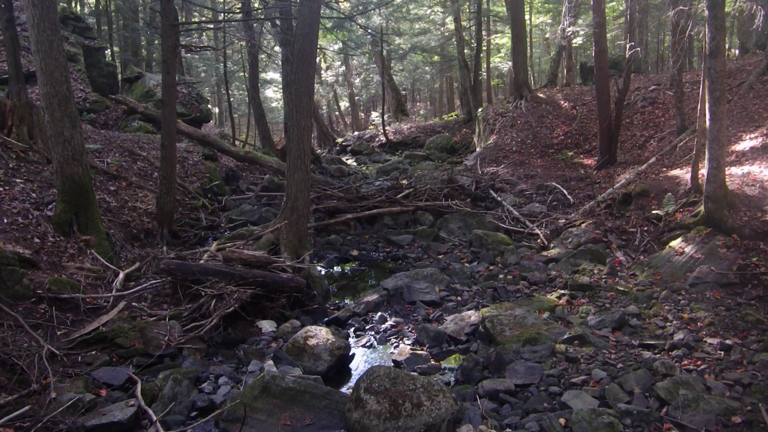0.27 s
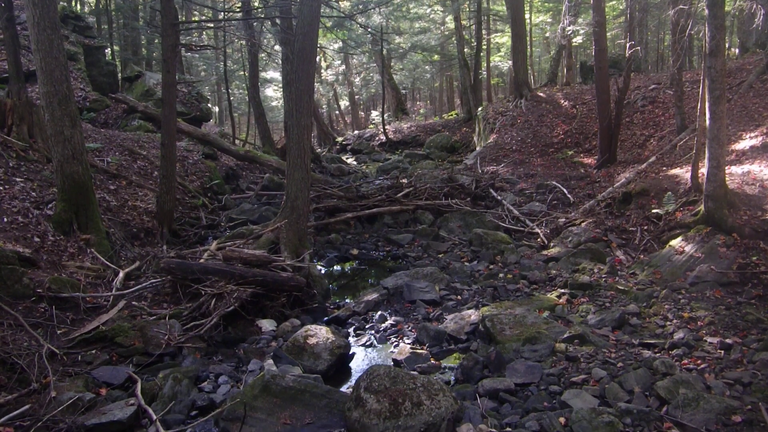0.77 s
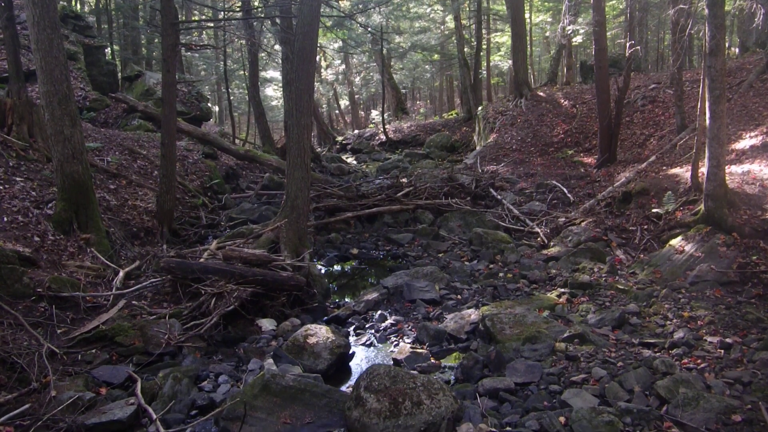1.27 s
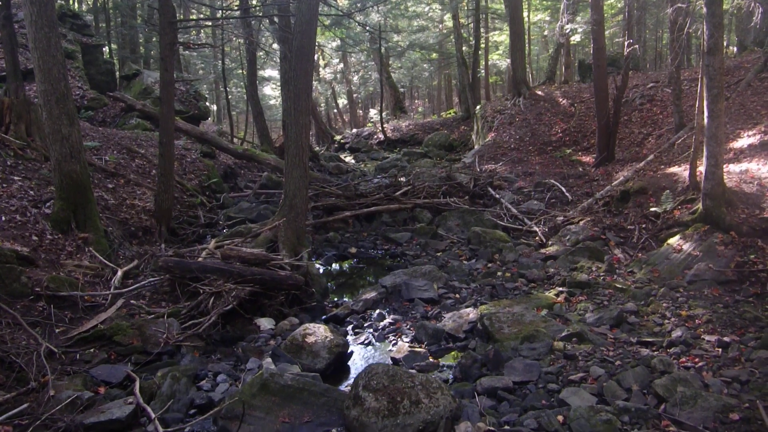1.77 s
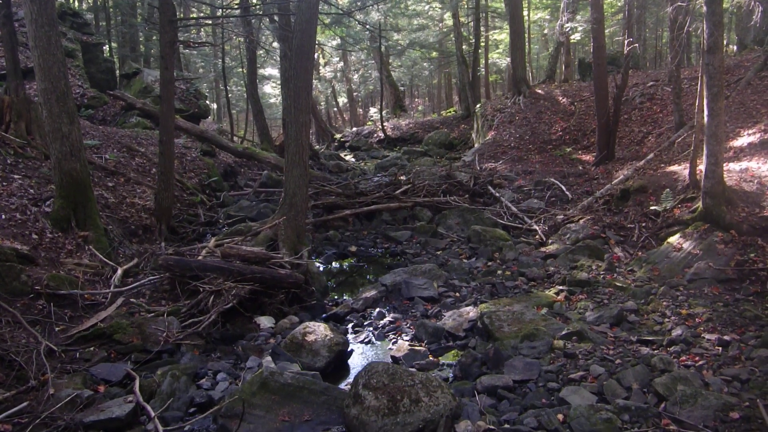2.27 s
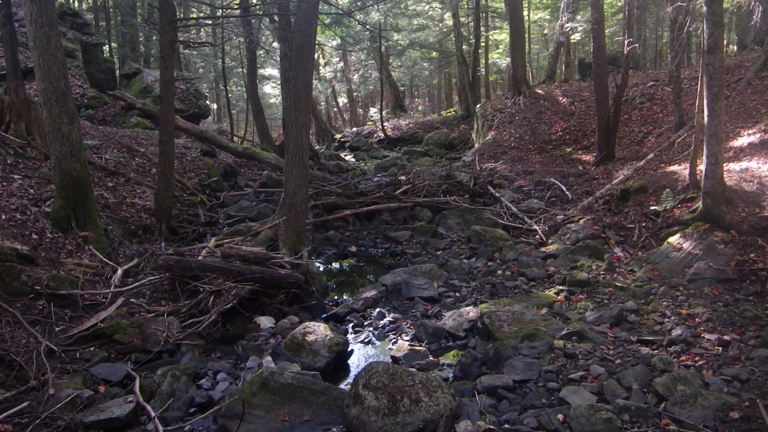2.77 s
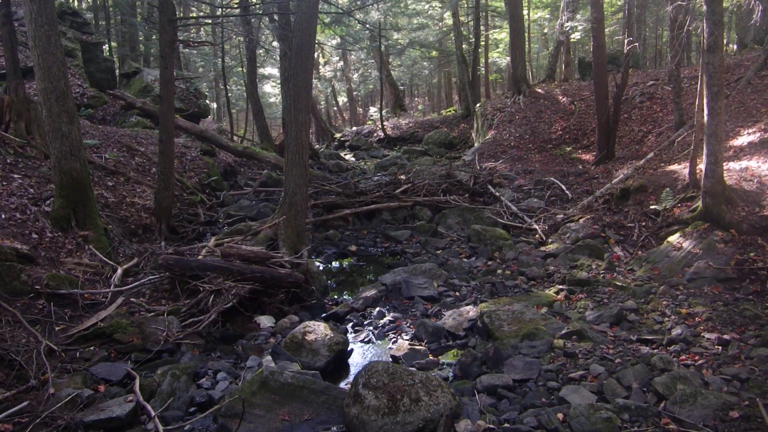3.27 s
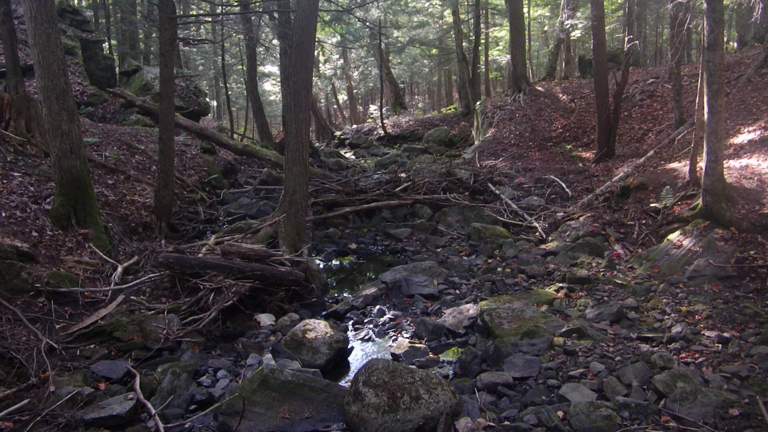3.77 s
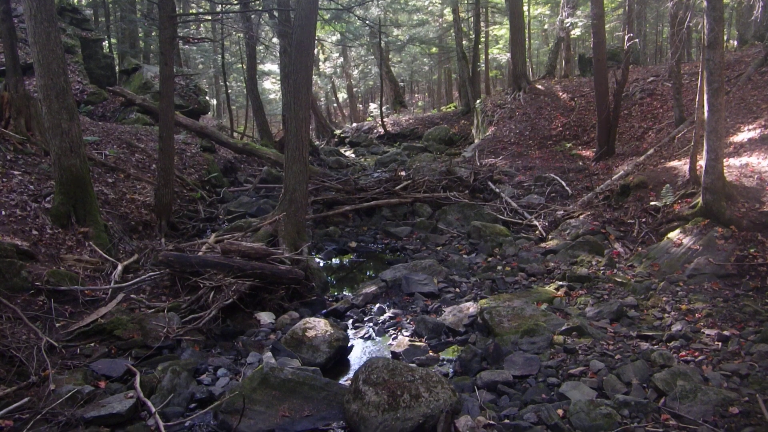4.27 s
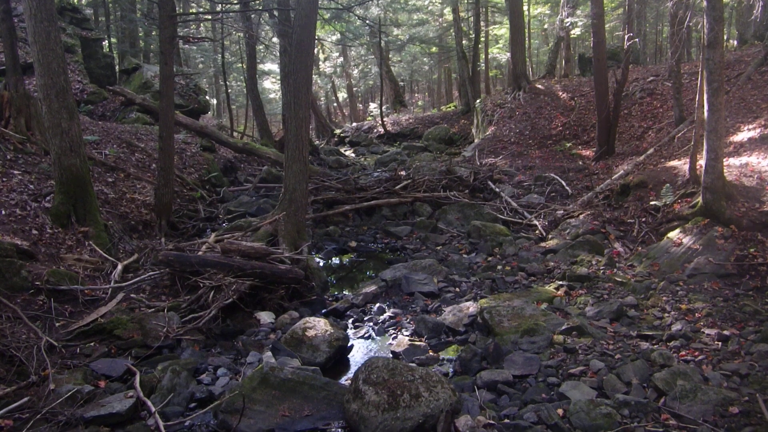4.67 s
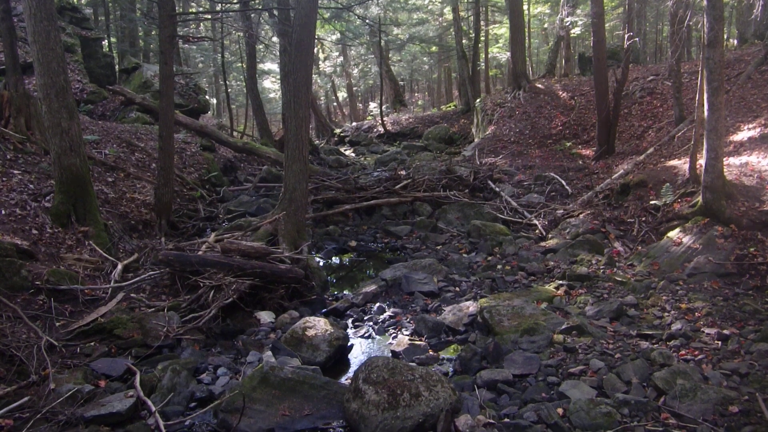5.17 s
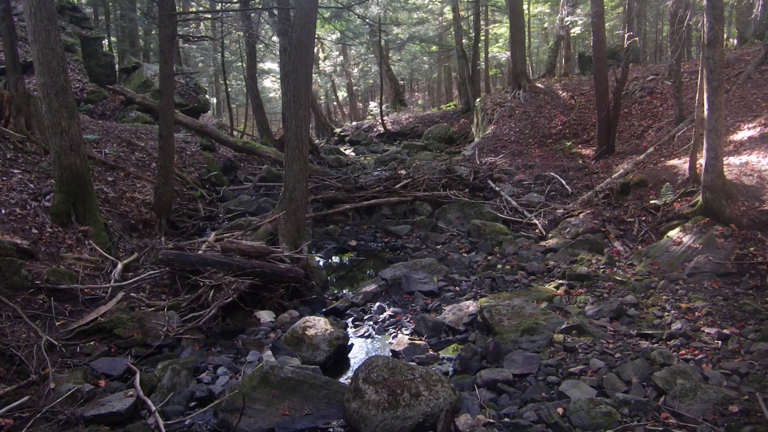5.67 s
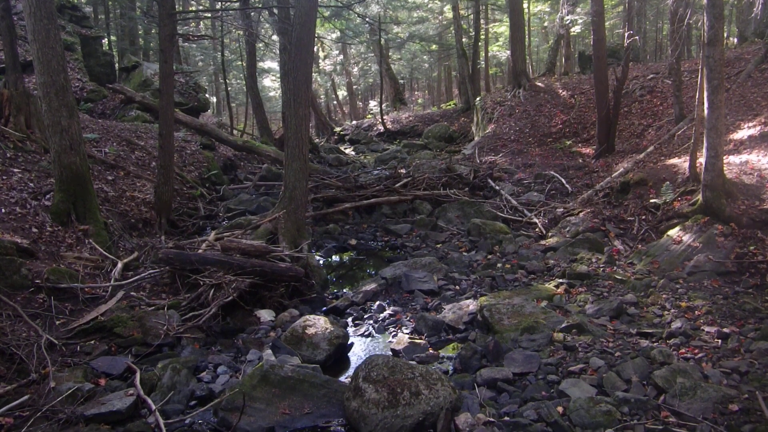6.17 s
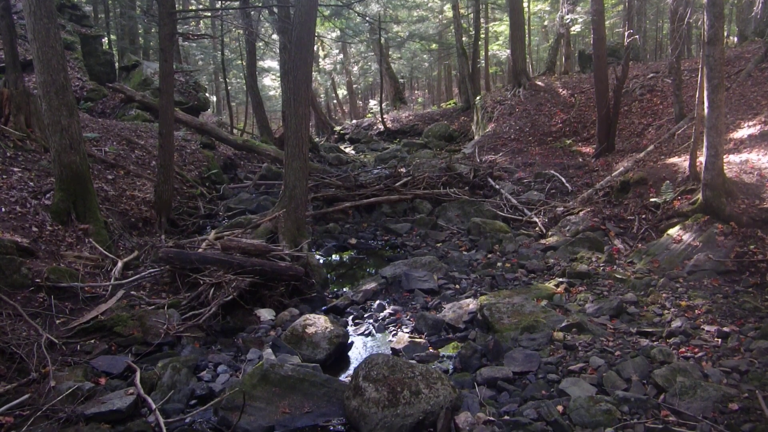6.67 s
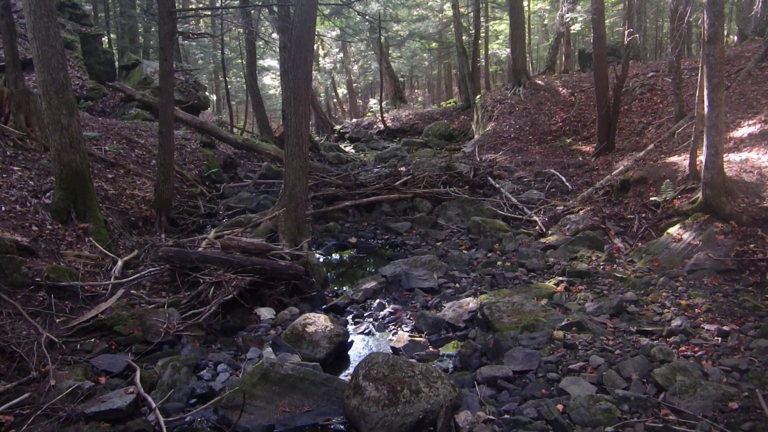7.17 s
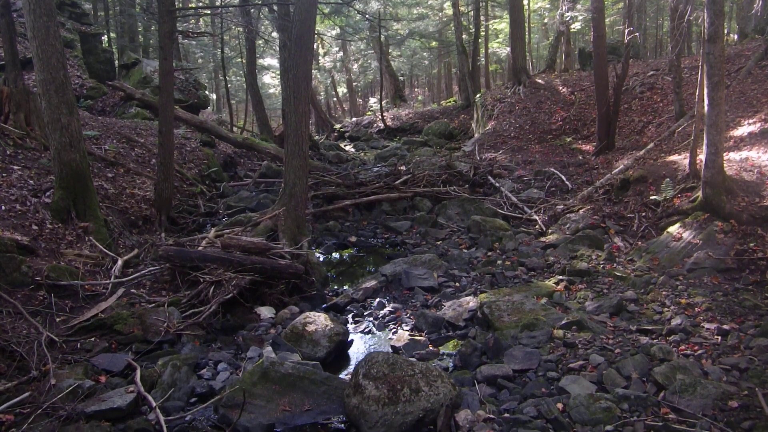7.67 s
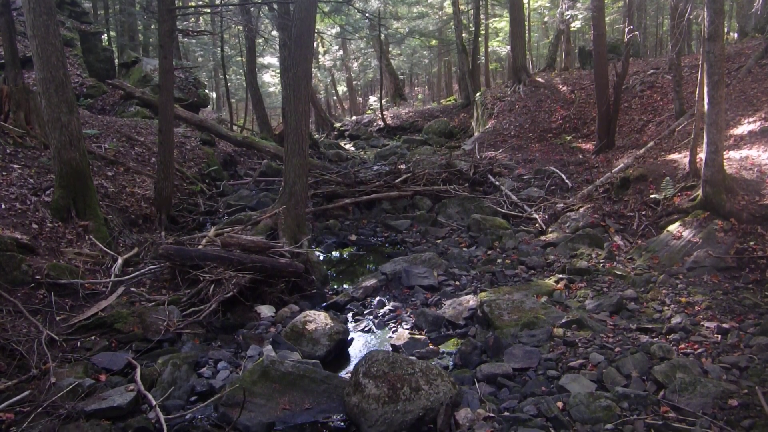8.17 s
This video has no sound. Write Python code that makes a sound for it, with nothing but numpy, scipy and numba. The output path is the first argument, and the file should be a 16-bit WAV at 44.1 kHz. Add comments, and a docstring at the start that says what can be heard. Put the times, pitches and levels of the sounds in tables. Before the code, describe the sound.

A small, shallow forest creek trickles over stones for about 8.4 seconds: a soft, steady wash with clusters of little bubbling gurgles and nearer, rounder plops, notably at 1.2, 3.5, 4.2 and 5.8 seconds. Trees return a short, faint diffuse tail. A hand-held camera adds low, lumpy grip rumble and very close contact noises. Bright plastic snaps with hard body knocks crack at 0.2 and 0.44 seconds. At 1.6 a tick leads straight into the loudest knock, followed by a dull palm bump. Quieter taps lead to a cluster of knocks and a sharp snap at 3.14 to 3.2, while the rumble swells. Later come light taps, faint snaps near 5.4 and 8.0, and soft low bumps at 4.6, 6.5, 7.8 and 8.1. Thin preamp hiss persists; the level ducks after loud peaks and recovers. Mono, with slightly dulled treble.

```python
"""A shallow forest creek trickles over stones throughout: a soft wash with small bubbles in it.
The hand-held camera rumbles in the grip. Hard knocks and snaps come in the first half second; at 1.6 s
a tick leads into the loudest knock, the first soft bump follows, and more snaps come near 3.2 s.
Lighter knocks, a few bumps and faint snaps fill the rest. Body and shell sounds are ringing modes.
The preamplifier hisses, gain control ducks after loud peaks and narrow notches cut the treble."""
import sys
import numpy as np
from scipy import signal
from scipy.fft import rfft, irfft, next_fast_len
from scipy.io import wavfile
from scipy.ndimage import uniform_filter1d, map_coordinates
from numba import njit

SR = 44100
rng = np.random.default_rng(int(sys.argv[2]) if len(sys.argv) > 2 else 0)


def digitize_waveform(pressure):
    """Quantize a signal to 16-bit integers and store it at the path in sys.argv[1].

    Rows of a 2-D input are taken as channels; values are limited to [-1, 1].
    """
    field = np.atleast_2d(pressure).T
    bounded = np.clip(field, -1, 1)
    quanta = np.round(bounded * 32767).astype(np.int16)
    wavfile.write(sys.argv[1], SR, quanta)


N = 371322  # length in samples


def amp(db):
    """Turn decibels into a gain: every 20 dB is a factor of ten."""
    return 10 ** (np.asarray(db) / 20)


def unit(x):
    """Scale x to an average (rms) strength of 1."""
    return x / np.sqrt(np.mean(x ** 2) + 1e-20)


def along(points, hz):
    """Read a curve of (frequency, value) points, spaced by the log of frequency."""
    point_hz, value = np.transpose(points)
    return np.interp(np.log(hz + 1), np.log(point_hz + 1), value)


def wobble(rate):
    """Draw a smooth random curve through this many random points a second."""
    points = rng.standard_normal(int(N * rate / SR) + 4)
    return map_coordinates(points, [np.arange(N) * rate / SR])


def filtered(x, response):
    """Filter x by multiplying its spectrum by a response that depends on frequency."""
    size = next_fast_len(N + SR // 2)  # spare room keeps the end from wrapping onto the start
    hz = np.fft.rfftfreq(size, 1 / SR)
    return irfft(rfft(x, size) * response(hz), size)[..., :N]


def resonances(modes):
    """Build the response of modes that ring when struck: (pitch_hz, width_hz, level_db)."""
    def response(hz):
        return sum(amp(level_db) * 1j * hz * width / (pitch * pitch - hz * hz + 1j * hz * width)
                   for pitch, width, level_db in modes)
    return response


def scatter(start_s, shapes):
    """Add one short sound, a row of shapes, at each start time."""
    first = (np.asarray(start_s) * SR).astype(int)[:, None]
    at = first + np.arange(shapes.shape[1])
    return np.bincount(at.ravel(), shapes.ravel(), N + SR)[:N]


def rush(spectrum, patchy_db):
    """Make coloured noise of rms 1 whose level varies in patches of time and frequency."""
    z = signal.stft(rng.standard_normal(N + 512), nperseg=512)[2]
    patches = uniform_filter1d(rng.standard_normal(z.shape), size=4, axis=0)
    patches = uniform_filter1d(patches, size=8, axis=1)
    noise = signal.istft(z * amp(patchy_db * unit(patches)), nperseg=512)[1][:N]
    return unit(filtered(noise, lambda hz: amp(along(spectrum, hz))))


def wash():
    """Far water blends into coloured noise whose level sways slowly and quickly."""
    # colour of the far water: (frequency_hz, relative level_db per Hz)
    colour = [(71, -17), (120, -4.5), (229, -15), (311, -6.5), (430, -2.5), (754, -12.5), (1320, -13.5),
              (1540, -16), (2570, -16.5), (2890, -18.5), (3200, -26), (4130, -31.5), (4570, -21.5),
              (5150, -36), (7000, -46), (9100, -72), (15400, -120)]
    level_db = -48.5 + 0.71 * wobble(2.38) + 0.88 * wobble(13)
    return amp(level_db) * rush(colour, patchy_db=1.62)


def bubbles(start_s, level_db, pitch_hz, t60_s, rise):
    """Each bubble is a damped sine with a soft start; its pitch climbs as it nears the surface."""
    t = np.arange(SR // 16) / SR
    level_db, pitch_hz = level_db[:, None], pitch_hz[:, None]
    t60_s = np.clip(t60_s, .004, .12)[:, None]  # time to fade by 60 dB
    phase = 2 * np.pi * pitch_hz * (t + rise * t * t / t60_s)
    soft_start = 1 - np.exp(-t * pitch_hz / 0.58)
    return scatter(start_s, amp(level_db - 60 * t / t60_s) * soft_start * np.sin(phase))


def babble(count=350, size=4):
    """Gurgles are small groups of bubbles, close together in time and pitch."""
    lag_s = np.minimum(.04 * rng.exponential(size=(count, size)), .3)
    start_s = rng.uniform(0, N / SR - .3, (count, 1)) + lag_s
    # each gurgle has its own pitch and level; its bubbles spread around them
    log_pitch = .5 * rng.standard_normal((count, 1)) + .12 * rng.standard_normal((count, size))
    level_db = 3 * np.minimum(rng.exponential(size=(count, 1)), 3)
    level_db = level_db + 3.8 * rng.standard_normal((count, size))
    pitch_hz = np.clip(1350 * np.exp(log_pitch), 250, 2550).ravel()
    t60_s = 50 / pitch_hz
    return amp(-56) * unit(bubbles(start_s.ravel(), level_db.ravel(), pitch_hz, t60_s, rise=0.18))


def plops():
    """The nearest single bubbles ring longer when they are low."""
    # nearest bubbles: (start_s, level_db, pitch_hz at the start)
    nearest = [(.614, -43.5, 1140), (1.185, -30.5, 558), (1.358, -40, 1350), (1.442, -42, 669),
               (1.746, -41.5, 1950), (1.87, -39, 1366), (2.525, -39.5, 1170), (2.554, -43.5, 786),
               (3.063, -42.5, 1560), (3.105, -41, 1170), (3.52, -30.5, 707), (3.563, -35, 2470),
               (3.65, -45, 2500), (3.989, -39.5, 1200), (3.992, -39, 2540), (4.155, -33, 590),
               (4.434, -41.5, 2460), (4.526, -34, 583), (4.585, -41.5, 2080), (4.691, -40.5, 1970),
               (4.816, -36, 900), (4.921, -36.5, 2730), (5.21, -37.5, 647), (5.368, -39, 650),
               (5.612, -42, 1950), (5.811, -31, 745), (5.955, -41, 1300), (6.049, -41, 2520),
               (6.385, -35.5, 907), (6.632, -42, 1084), (6.818, -40, 1230), (7.016, -39.5, 1880),
               (7.203, -34, 975), (7.252, -39.5, 1140), (7.365, -40, 837), (7.659, -41.5, 1780),
               (7.813, -37.5, 727), (8.264, -37.5, 1320), (8.362, -34.5, 1004), (8.392, -32.5, 997)]
    start_s, level_db, pitch_hz = np.transpose(nearest)
    t60_s = 0.05 * (1000 / pitch_hz) ** 0.34
    return bubbles(start_s, level_db, pitch_hz, t60_s, rise=0.092)


def trees(x):
    """Trunks and banks scatter the sound back; each frequency dies at its own speed."""
    # how long the scattered sound lasts: (frequency_hz, t60_s)
    fading = [(200, 0.062), (2000, 0.3), (8000, 0.19)]
    hz, t, z = signal.stft(rng.standard_normal(SR // 3), SR, nperseg=256)
    fade_db = -60 * t / along(fading, hz)[:, None]
    tail = signal.istft(z * amp(fade_db), SR, nperseg=256)[1]
    return signal.fftconvolve(x, tail / np.linalg.norm(tail))[:N]


def creek():
    """Far water, gurgles and near bubbles sound together; the trees return the bubbles."""
    near = babble() + plops()
    return wash() + near + amp(-9) * trees(near)


def rumble():
    """The grip shakes the body as low noise that swells in quick, uneven lumps."""
    # strength of the grip's rumble: (time_s, level_db)
    grip = [(0, -38.5), (.2, -40.5), (1.2, -40.5), (1.7, -38.5), (2.8, -38), (3.4, -34.5), (3.9, -36),
            (4.4, -39), (4.7, -39), (6.4, -42.5), (7.3, -40), (8.42, -38.5)]
    # colour of the rumble: (frequency_hz, relative level_db per Hz)
    colour = [(7.1, -35.5), (12, -2), (23, 2), (40, -3), (76, -8), (107, -18), (250, -32.5), (320, -70.5),
              (550, -120)]
    time_s, grip_db = np.transpose(grip)
    level_db = np.interp(np.arange(N) / SR, time_s, grip_db)
    lumps = amp(np.clip(2.2 * wobble(14) + 3.1 * wobble(30), -7, 5))
    return amp(level_db) * unit(lumps * rush(colour, patchy_db=-0.5))


def bumps():
    """At a soft bump of the palm the whole body swings a few times, low and dull."""
    # palm bumps: (start_s, peak level_db)
    palm = [(1.625, -20.5), (2.108, -32), (4.575, -26.5), (6.5, -29.5), (7.775, -20), (8.138, -26)]
    pitch_hz, t60_s, rise_s = 48.2, 0.11, 0.0061
    start_s, level_db = np.transpose(palm)
    t = np.arange(SR // 6) / SR
    envelope = amp(-60 * t / t60_s) * (1 - np.exp(-t / rise_s))
    swing = envelope * np.sin(2 * np.pi * pitch_hz * t)
    return scatter(start_s, amp(level_db)[:, None] * swing / swing.max())


def tick():
    """Just before the loudest knock, a smooth one-sided push rises and falls in about a millisecond."""
    start_s, level_db, width_s = 1.6016, -2.5, .00035
    u = np.arange(SR // 100) / SR / width_s - 3  # the peak comes three widths after the start
    return scatter([start_s], -amp(level_db) * np.exp(-u * u)[None])


def snaps():
    """Plastic snaps are short bursts of bright rattle that also ring the thin shell."""
    # snaps: (start_s, level_db, low_hz, high_hz, length_s, ring_db, ping_db);
    # shell ring and ping are relative to the snap's level
    snap_list = [(0.1986, -1, 8600, 12200, 0.00077, -12, -13.5),
                 (0.4427, -10.5, 7600, 12900, 0.00054, 0, -5), (.546, -59, 3000, 5920, 0.0066, -2, -8),
                 (3.135, -35, 4200, 6800, 0.0038, -10, -4), (3.14, -37, 4470, 9930, 0.0013, 11, 8),
                 (3.2039, 3, 5500, 19540, 0.002, -7.5, 0.5), (5.394, -45, 4000, 6960, .0087, -6, -1),
                 (7.965, -49, 4100, 5200, .012, 2, 16)]
    # ring of the thin outer shell: (pitch_hz, width_hz, level_db)
    shell = [(1804, 260, 0.5), (2300, 260, -8), (2850, 260, -9.5)]
    # high ping of the shell: (pitch_hz, width_hz, level_db)
    high_ping = [(4570, 220, 0)]
    t, bright = np.arange(SR // 100) / SR, []  # every burst is cut off at 10 ms
    for _, level_db, low_hz, high_hz, length_s, *_ in snap_list:
        swell = np.sin(np.pi * np.clip(t / length_s, 0, 1) ** 0.67)
        burst = amp(level_db) * swell * np.sign(rng.standard_normal(len(t)))
        burst[0] = amp(level_db + 4) * min(1, .002 / length_s)  # first crack, softer in a slow snap
        band = signal.butter(3, [low_hz, min(high_hz, 21000)], "bandpass", fs=SR, output="sos")
        bright.append(signal.sosfilt(band, burst))
    start_s, level_db, *_, ring_db, ping_db = np.transpose(snap_list)
    blow = amp(level_db[:, None] + 18.5 - 60 * t / 0.00034)  # a very short push sets the shell ringing
    ring = filtered(scatter(start_s, amp(ring_db)[:, None] * blow), resonances(shell))
    ping = filtered(scatter(start_s, amp(ping_db)[:, None] * blow), resonances(high_ping))
    return scatter(start_s, np.array(bright)) + ring + ping


def strike_body(start_s, level_db, thud_db, hollow_db, edge_db, sway, scatter_db):
    """Each knock rings the body modes, weighted by where and how hard it lands."""
    # modes of the camera body: (pitch_hz, level_db, t60_s)
    body = [(66.6, 7, 0.022), (105.8, -3.5, 0.04), (197, 7.5, 0.048), (258, -5.5, 0.049), (328.3, 0, 0.05),
            (421.5, -1, 0.059), (720, 2.5, 0.012), (970, -4, 0.026), (1350, -5, 0.0076)]
    t, sizes, rings = np.arange(SR // 10) / SR, [], []
    chance_db = scatter_db * rng.standard_normal((len(start_s), len(body)))
    for k, (hz, mode_db, t60_s) in enumerate(body):
        if hz < 130:
            weight_db = thud_db
        elif hz < 280:
            weight_db = hollow_db
        elif hz < 600:
            weight_db = 0  # the main modes
        else:
            weight_db = edge_db
        envelope = amp(mode_db - 60 * t / t60_s) * (1 - np.exp(-t / 0.001))
        rings.append(envelope * np.sin(2 * np.pi * hz * t))
        upper_main = 370 < hz < 600
        sizes.append(amp(level_db + weight_db + chance_db[:, k]) * (sway if upper_main else 1))
    return scatter(start_s, -np.transpose(sizes) @ np.array(rings))


def taps(count=700):
    """Many faint touches at random times ring the body very softly."""
    start_s = rng.uniform(0, N / SR, count)
    level_db = 2.6 * np.minimum(rng.exponential(size=count), 3)
    sway = np.sign(rng.standard_normal(count))
    touches = strike_body(start_s, level_db, thud_db=-14.5, hollow_db=-20.0, edge_db=-16.5,
                          sway=sway, scatter_db=5.0)
    return amp(-50) * unit(touches)


def knocks():
    """Single knocks on the camera body ring its thud, hollow, main and hard-edge modes."""
    # knocks: (start_s, level_db, thud_db, hollow_db, sway); thud and hollow are relative to the level,
    # sway is the signed size [no unit] of the upper main mode, set by where the knock lands
    knock_list = [(.199, -7.5, -12.5, -18, 1.06), (0.26, -38.5, -6, -19, 2.5), (.35, -37, -7, -16, 1.5),
                  (0.443, -5, -12, -15.5, 0.7), (.547, -39, -13, -23, 1.9), (1.142, -27.5, -5, -21, 2.5),
                  (1.6036, 6.5, -7, -19.5, -0.4), (1.803, -27.5, -5, -22.5, .7),
                  (2.079, -30, -4, -20, -0.85), (2.461, -37, -14, -21, 2), (2.873, -32.5, -11, -18, 3.5),
                  (2.936, -36.5, -3, -21, 6), (3.1417, -16, -25, -1, 0.73), (3.186, -33, -24, -12, 2.2),
                  (3.2018, -13, -10, 8, 1.95), (3.483, -27.5, 1.5, -6, 1.2), (4.88, -31.5, -10, -19, 2),
                  (4.963, -34.5, -15, -24, 1.5), (5.079, -44, -4, -17, 2.5), (5.512, -38, -18, -18, 3),
                  (5.717, -36.5, -12, -16, 2), (6.188, -33.5, -6, -22, 1.5), (6.22, -30, -12, -25, 0),
                  (6.326, -33, -18, -15, 2.5), (6.41, -31, -10, -20, 1.7), (6.446, -32, -8, -20, 1.85),
                  (6.714, -31.5, -13, -30, 1.5), (7.25, -38, 7.5, 1.5, -0.3), (7.77, -35, -10, -13, .8),
                  (7.912, -35.5, -14, -22, 2), (7.957, -31, -2, -22, 1.5), (8.046, -30, -12.5, -1.5, 1),
                  (8.162, -33, -12, -9.5, 1)]
    start_s, level_db, thud_db, hollow_db, sway = np.transpose(knock_list)
    return strike_body(start_s, level_db, thud_db, hollow_db, edge_db=-15.5, sway=sway, scatter_db=2.12)


def hands():
    """The fingers and palm shake, touch and strike the camera body."""
    return rumble() + bumps() + taps() + tick() + snaps() + knocks()


def scene():
    """The creek and the handling of the camera add up in one channel."""
    return (creek() + hands())[None]


def hiss():
    """The preamplifier adds a faint, mostly high noise."""
    # colour of the hiss: (frequency_hz, relative level_db per Hz)
    colour = [(2000, -52.5), (5000, -8), (8000, -5), (14500, 0.5), (16000, -6.5)]
    return amp(-60) * rush(colour, patchy_db=-0.8)


@njit
def ducking(need_db, hold, step_db):
    """The gain drops at once, waits for hold samples, then climbs back by step_db a sample."""
    gain, wait, out = 0.0, 0.0, np.empty_like(need_db)
    for i in range(len(need_db)):
        if need_db[i] < gain:
            gain, wait = need_db[i], hold
        elif wait > 0:
            wait -= 1
        else:
            gain = min(0.0, gain + step_db)
        out[i] = gain
    return out


def gain_control(x):
    """Loud peaks turn the gain down; lifted treble makes the control more alert to bright sounds."""
    limit_db, hold_s, climb_db_per_s = -5, .26, 12
    lifted = x + 2.14 * np.diff(x, prepend=0)
    power = np.abs(uniform_filter1d(lifted ** 2, size=200))
    level_db = 10 * np.log10(power + 1e-12)
    need_db = np.minimum(limit_db - level_db, 0)
    gain_db = ducking(need_db, hold_s * SR, climb_db_per_s / SR)
    return x * amp(uniform_filter1d(gain_db, size=100))


def notches(hz):
    """Notch filters cut narrow bands; a sharp snap leaves the narrow ones ringing."""
    # notches: (centre_hz, width_hz)
    cuts = [(3187, 95), (4070, 170), (5125, 330), (5663, 350), (7127, 290), (8183, 46)]
    depth = .97  # 1 would silence the centre
    return np.prod([1 - depth * 1j * hz * width / (centre * centre - hz * hz + 1j * hz * width)
                    for centre, width in cuts], axis=0)


def band_limit(hz):
    """The treble fades out from 15610 Hz and is gone at 15910 Hz."""
    return np.clip((15910 - hz) / 300, 0, 1) ** 2


def record(dry):
    """Hiss, gain control, notches, soft clipping and a treble limit shape the sound in turn."""
    x = gain_control(dry[0] + hiss())
    x = filtered(x, notches)
    x = x / (1 + np.abs(x / .72) ** 8) ** (1 / 8)  # peaks bend over towards .72
    return filtered(x, band_limit)[None]


dry = scene()
out = record(dry)
digitize_waveform(out)
```